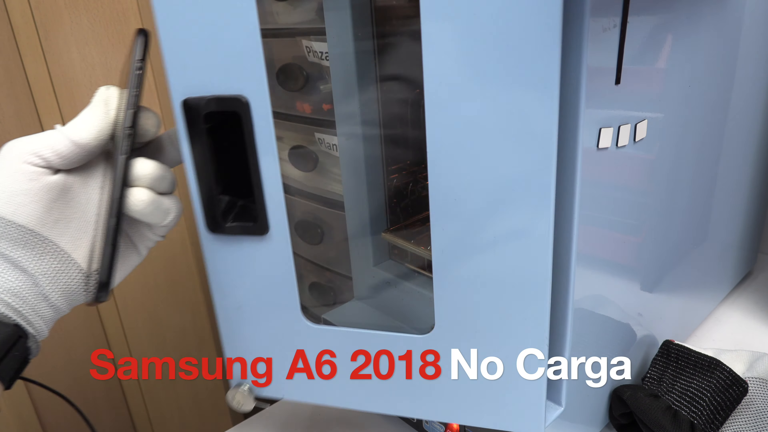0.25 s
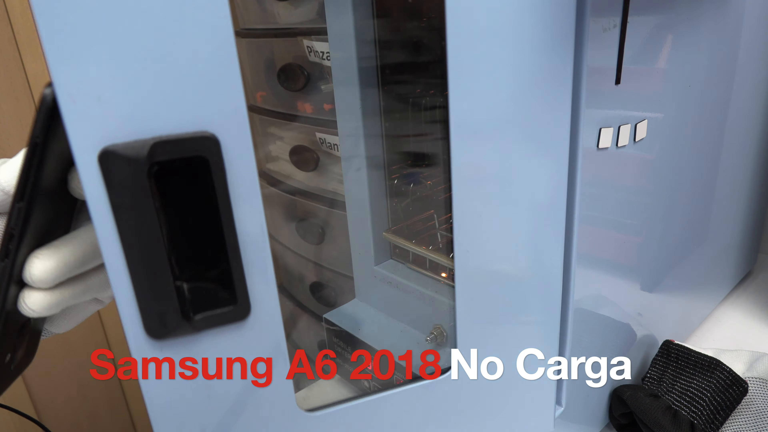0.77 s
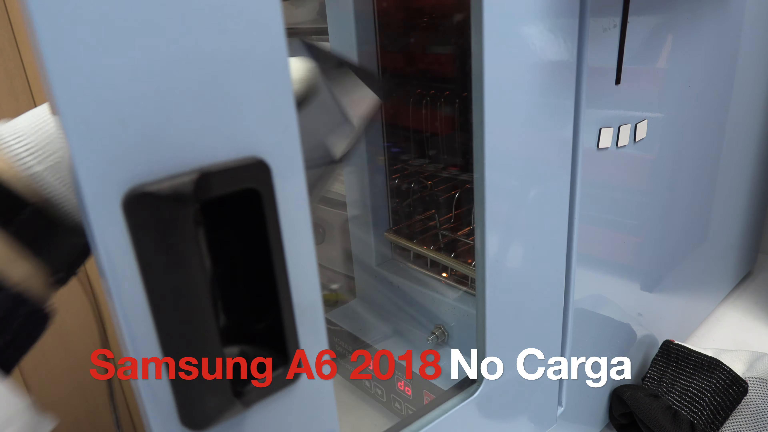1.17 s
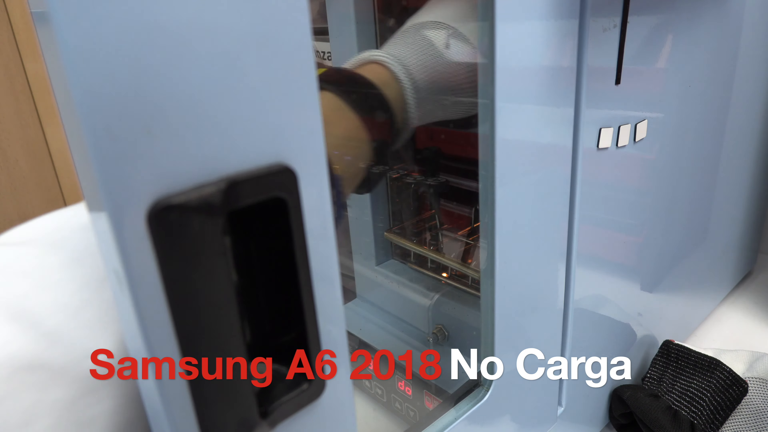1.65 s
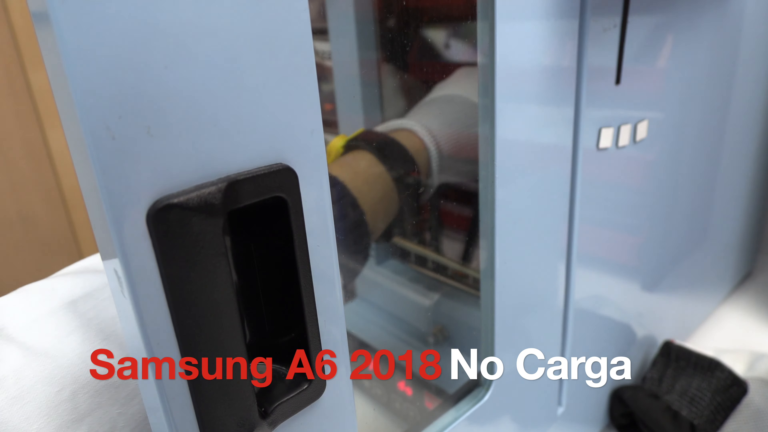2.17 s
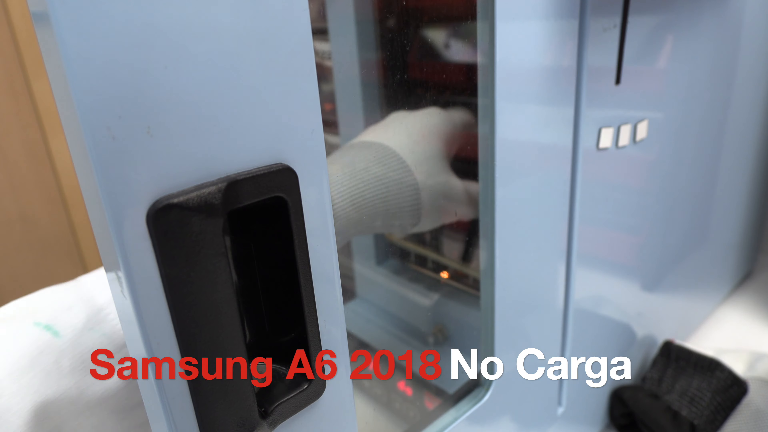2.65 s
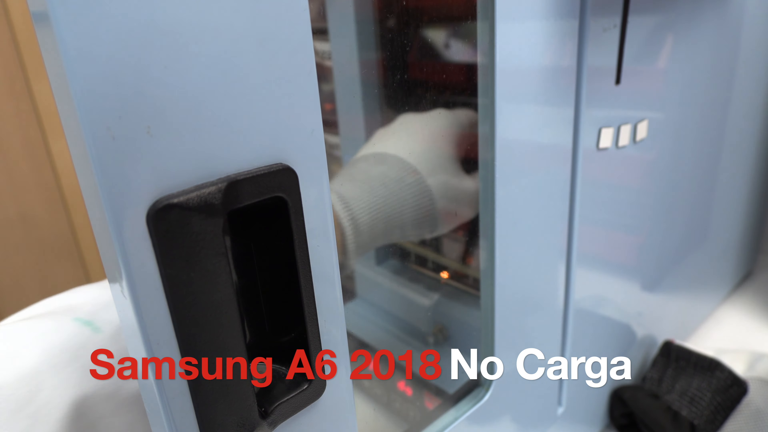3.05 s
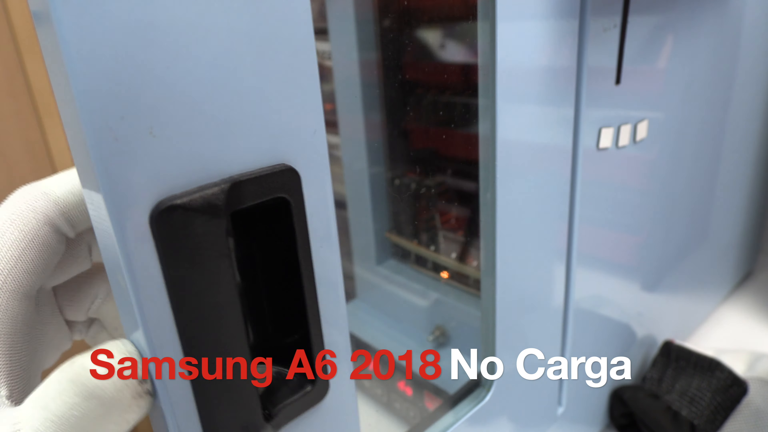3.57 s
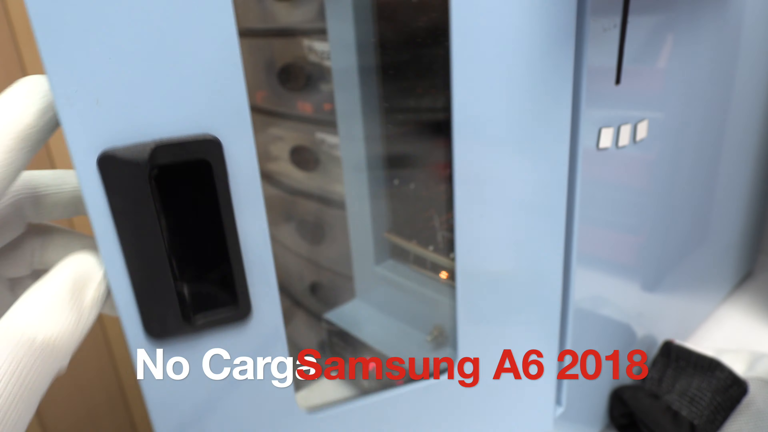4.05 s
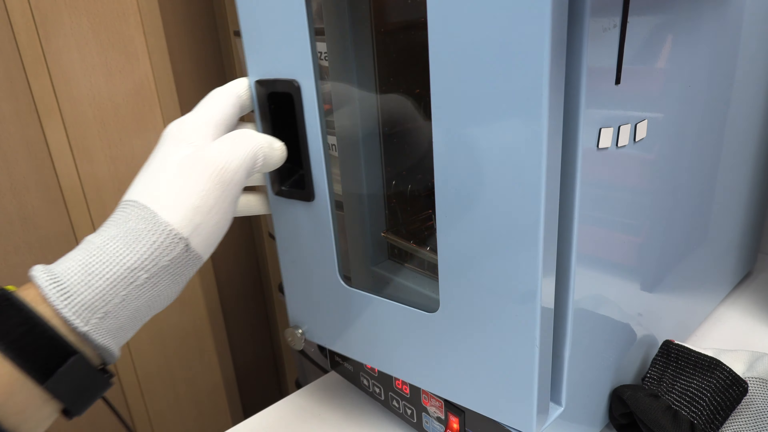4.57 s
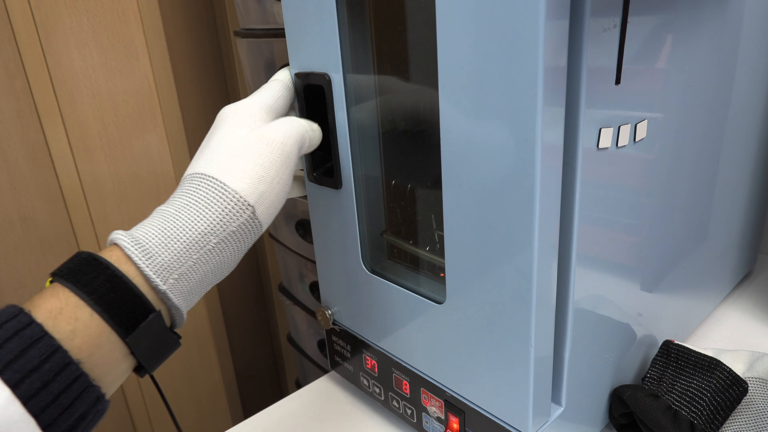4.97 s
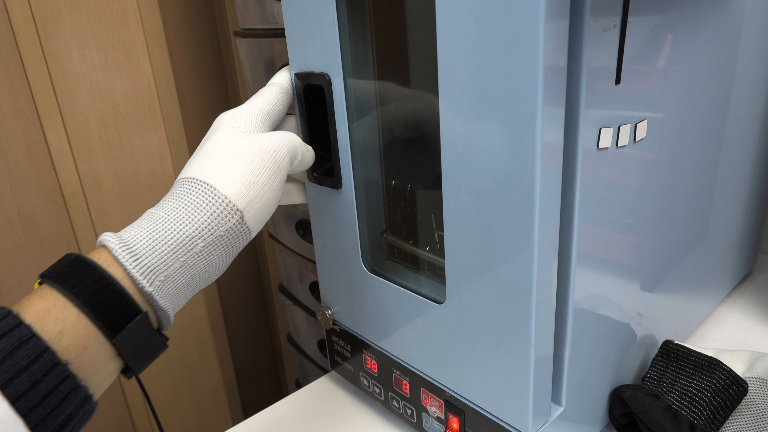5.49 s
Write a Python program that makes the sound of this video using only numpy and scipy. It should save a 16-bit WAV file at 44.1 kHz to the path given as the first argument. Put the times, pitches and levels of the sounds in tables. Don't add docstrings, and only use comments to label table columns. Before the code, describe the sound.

A quiet workshop with a low, steady ventilation wash and faint fan hum, heard close by a small stereo microphone. At 0 s a gloved hand brushes a light steel door; clicks and a dull panel thump follow, strongest near 0.16 s, with hinge knocks around 0.65 s and small ticks near 0.95-1.06 s. Soft cloth rustles from 1.2 to 1.9 s. At about 1.94 s an object lands on a wire shelf, a dense metallic clatter until 2.1 s over a hollow, swelling boom. It shifts lightly near 2.4 s, then scrapes and rattles from 2.76 to 3.05 s. Faint glove rustle and a small door tick come at 3.44 s, then near quiet. At 4.55 s the door clunks against its frame, rubber rubs in two hissing slides until 4.97 s, and a loud, bright latch snap with a panel thud lands at 4.99 s. A short echo fades into ventilation.

```python
import sys
import numpy as np
from scipy import signal
from scipy.fft import rfft, irfft
from scipy.io import wavfile
from scipy.ndimage import uniform_filter1d

SR = 44100
rng = np.random.default_rng(int(sys.argv[2]) if len(sys.argv) > 2 else 0)


def to_wav(sig):
    pcm = np.clip(np.atleast_2d(sig), -1, 1) * 32767
    pcm = np.round(pcm).astype(np.int16)
    wavfile.write(sys.argv[1], SR, pcm.T)


def nominal_scale(level):
    x = np.asarray(level, float) / 20
    return 10 ** x


N = 252620

# (frequency [Hz], likeness [0-1])
LEFT_RIGHT_LIKENESS = [(60, 0.98), (180, 1), (550, 0.9), (1650, 0.69), (4970, 0.39), (15000, 0.55)]


def evened(x):
    return x / np.sqrt(np.mean(x ** 2) + 1e-20)


def peaked(x):
    return x / np.sqrt(uniform_filter1d(x ** 2, 176).max() + 1e-20)


def read(points, hz):
    f, value = np.transpose(points)
    return np.interp(np.log(hz + 1), np.log(f + 1), value)


def add(mix, s, sound):
    part = mix[round(s * SR):][:len(sound)]
    part += sound[:len(part)]


def toward_left(db):
    return nominal_scale(np.array([[db], [-db]]))


def alike(first, other):
    return lambda hz: blend(first, other, np.clip(read(LEFT_RIGHT_LIKENESS, hz), -1, 1)[:, None])


def blend(first, other, likeness):
    return likeness * first + np.sqrt(1 - likeness ** 2) * other


def high_pass(x, order, hz):
    return signal.sosfilt(signal.butter(order, hz, "high", fs=SR, output="sos"), x)


def coloured(x, points, tilt_db=0):
    hz = np.fft.rfftfreq(len(x), 1 / SR)
    edge = np.minimum(hz / points[0][0], 1) ** 4
    gain_db = read(points, hz) + tilt_db * np.log2((hz + 1) / 4000)
    return evened(irfft(rfft(x) * edge * nominal_scale(gain_db), len(x)))


def resonate(x, hz, width):
    r = np.exp(-np.pi * width / SR)
    return evened(signal.lfilter([1, 0, -1], [1, -2 * r * np.cos(2 * np.pi * hz / SR), r * r], x))


def grainy(count, rough_db):
    lumps = evened(uniform_filter1d(rng.standard_normal(count), 200))
    return rng.standard_normal(count) * nominal_scale(rough_db * lumps)


def nearness(hz, spot_hz, reach):
    return np.maximum(-12 * (np.log2((hz + 1) / spot_hz) / max(reach, .15)) ** 2, -45)


def ring(modes, spot_hz, reach, length=.3):
    hz, db, t60 = np.transpose(modes)[:, :, None]
    t = np.arange(round(length * SR)) / SR
    level = nominal_scale(db + nearness(hz, spot_hz, reach) - 60 * t / t60)
    return (level * np.sin(2 * np.pi * hz * t)).sum(0)


def clicks(rows, spot_hz, reach):
    return [(s, db, treble_db, spot_hz, reach, chatter_ms) for s, db, treble_db, chatter_ms in rows]


def padded(rows, treble_db, reach):
    return [(s, db, treble_db, spot_hz, reach, chatter_ms) for s, db, spot_hz, chatter_ms in rows]


def hits(rows, body, sheet_db, sheet_t60, rise_ms, fine, wires_db):
    # (frequency [Hz], level [dB per Hz])
    crack = [(2500, -30), (4000, -19), (5100, -5), (6200, -2), (7600, 3), (9000, -2.5), (10800, -5.5),
             (12500, -10), (14500, -15), (16000, -72)]
    count = 8192
    out, t = np.zeros(N), np.arange(count) / SR
    hz = np.fft.rfftfreq(count, 1 / SR)
    wires = ring(fine, 7000, 9.0, .05)
    for s, db, treble_db, spot_hz, reach, chatter_ms in rows:
        sizes = nominal_scale(2.5 * np.minimum(rng.exponential(1, count), 3.1))
        contacts = rng.standard_normal(count) * sizes
        rise = np.minimum(t * 1000 / (rise_ms + 0.085 * chatter_ms), 1)
        fade = np.exp(-t * 1000 / max(chatter_ms, .5)) * rise
        chatter = fade * contacts

        stored = np.sqrt(signal.lfilter([1], [1, -nominal_scale(-120 / (sheet_t60 * SR))], fade ** 2))
        sheet = stored * irfft(rfft(contacts) * nominal_scale(nearness(hz, spot_hz, reach)))

        hardness = (3.75 / max(chatter_ms, 4.5)) ** 2
        first = signal.unit_impulse(count, 20) * hardness * np.linalg.norm(chatter)
        strong = signal.fftconvolve(first + 0.68 * chatter, ring(body, spot_hz, reach, .2))[:count]
        ringing = peaked(strong) + nominal_scale(sheet_db) * reach * peaked(sheet)
        add(out, s, nominal_scale(db) * peaked(ringing))

        fizz = nominal_scale(wires_db) * peaked(signal.fftconvolve(chatter, wires)[:count])
        edge = coloured(contacts, crack, .2 * min(treble_db + 8, 0))
        bright = peaked((fade + 0.22 * stored / stored.max()) * edge)
        add(out, s, nominal_scale(db + treble_db) * (fizz + bright))
    return out


def booms(rows, modes, swell_ms):
    out = np.zeros(N)
    for s, db, spot_hz in rows:
        low = ring(modes, spot_hz, 0.61, 0.59)
        swell = 1 - np.exp(-(np.arange(len(low)) * 1000 / SR / swell_ms) ** 2)
        add(out, s, nominal_scale(db) * peaked(swell * low))
    return out


def workshop():
    # (frequency [Hz], level [dB per Hz])
    air = [(18, -65.5), (30, -46), (64, -12), (160, -8.5), (187, -22), (263, -6), (292, -17), (432, -16),
           (546, -7.5), (606, -14), (921, -15), (10200, -32), (15500, -42.5)]
    # (frequency [Hz], width [Hz], level [dB])
    hum = [(167.4, 19.6, -76), (263.7, 24, -71), (344.3, 29, -76), (540, 68, -76), (918, 12, -81.5)]
    frames, hz = N // 256 + 5, np.fft.rfftfreq(1024, 1 / SR)
    a, b, c, d, patches = rng.standard_normal((frames, 513, 5)).T
    patches = evened(uniform_filter1d(uniform_filter1d(patches, 12, 0), 14, 1))
    left = a + 1j * b
    z = np.array([left, alike(left, c + 1j * d)(hz)])
    z *= nominal_scale(read(air, hz)[:, None] + 0.27 * patches)
    wash = signal.istft(z, nperseg=1024, noverlap=768)[1][:, :N]
    x = rng.standard_normal(N)
    fan = sum(nominal_scale(db) * resonate(resonate(x, f, width), f, width) for f, width, db in hum)
    return nominal_scale(-64.5) * evened(wash) + fan


def door_blows():
    # (frequency [Hz], level [dB], t60 [s])
    door_modes = [(600, 27.5, 0.043), (830, 20, 0.063), (1080, 19.5, 0.016), (1122, 9.5, .09),
                  (1320, 6, 0.14), (1410, -9.5, 0.077), (1650, -1, 0.03), (1775, -10, 0.051),
                  (1930, -9, 0.088), (2120, -7, 0.06), (2260, 0, 0.037), (2406, 9.5, 0.045),
                  (2500, 1.5, .05), (2586, 3, 0.07), (2800, 6.5, 0.07), (3050, -1, .04), (3410, -12, .025),
                  (4080, 10, 0.024)]
    # (frequency [Hz], level [dB], t60 [s])
    latch_modes = [(5220, -5, .02), (6020, -5, .02), (6500, 7, .014), (7120, -9, .03), (7740, -3, .035),
                   (8080, -5, .045), (8700, -8, .03)]
    # (time [s], blow [dB], treble re blow [dB], chatter [ms])
    door_clicks = [(.060, -42.5, -15, 3.6), (.074, -53.5, -4, 3.5), (.156, -35, -21.5, 2.5),
                   (.163, -37, -29, 2.7), (.645, -46, -21, 1.4), (.742, -62, -7, 5.9), (.955, -53, -7, 2.2),
                   (.979, -58.5, -9, 2.3), (1.04, -61.5, -9, 2.5), (1.05, -59, -8, 3.6),
                   (1.063, -57.5, -8, 4), (1.676, -72, 7.5, 3.5), (3.413, -58, -16, 19),
                   (3.44, -53, -12.5, 3.8), (4.016, -64, -10, 6.3), (4.154, -59, -3.5, 1.4)]
    # (time [s], blow [dB], treble re blow [dB], chatter [ms])
    latch_clicks = [(4.526, -58.5, -3, 11), (4.547, -31, -18, 5.1), (4.560, -31, -20, 3.1),
                    (4.572, -37, -16, 11), (4.979, -25, -8, 1.3), (4.986, -21, -6.5, 1.9),
                    (4.996, -25, 3, 1.7), (5.004, -30.5, 1.5, 1.9), (5.06, -44, -21, 3.1)]
    # (time [s], blow [dB], struck spot [Hz], chatter [ms])
    door_rings = [
        (.0, -48, 1930, 8.5),
        (.001, -56, 2780, 18),
        (.185, -51, 2050, 34),
        (.647, -44, 1710, 7.5),
        (.655, -52, 1330, 3.7),
        (1.225, -60, 1630, 11),
        (1.27, -64, 1630, 11),
        (1.31, -63, 1580, 6),
        (3.765, -63, 1350, 7),
        (4.872, -48, 600, 4),
    ]
    # (time [s], blow [dB], struck spot [Hz], chatter [ms])
    door_knocks = [(.132, -49.5, 600, 7.1), (.158, -41.5, 790, 1.2), (.65, -58.5, 830, 4.9),
                   (.958, -58, 1000, 15), (3.442, -55.5, 3300, 4), (3.756, -57, 3180, 2.8),
                   (4.5445, -36.5, 5330, 2.7), (4.556, -38.5, 700, 12.6), (4.965, -51.5, 700, 4),
                   (4.986, -28, 2700, 9), (5.002, -33, 1080, 4), (5.017, -34, 1290, 4.9),
                   (5.012, -37, 2650, 26), (4.6, -49, 1900, 24)]
    rows = clicks(door_clicks, spot_hz=2050, reach=1) + clicks(latch_clicks, spot_hz=2310, reach=0.91)
    rows += padded(door_rings, treble_db=-23.5, reach=0.17) + padded(door_knocks, treble_db=-26, reach=0.98)
    blows = hits(rows, door_modes, sheet_db=4.0, sheet_t60=0.059, rise_ms=0.4, fine=latch_modes, wires_db=-10.0)
    return high_pass(blows, 2, 420.0)


def panel_booms():
    # (frequency [Hz], level [dB], t60 [s])
    panel_modes = [(55, -20.5, .15), (84.1, -17, 0.225), (108.7, -9.5, 0.2), (160, -8.5, 0.2),
                   (220, 1, 0.14), (262.9, -4.5, 0.29), (375, -4, 0.089), (426.5, 7, 0.059),
                   (615.5, -1.5, 0.14)]
    # (time [s], level [dB], favoured frequency [Hz])
    pushes = [(.0, -56, 100), (.01, -51.5, 266), (.1, -59, 199), (4.547, -54.5, 110), (.062, -48, 406),
              (.157, -49, 490), (.665, -53, 220), (.955, -58, 407), (1.065, -53, 250), (1.09, -61, 100),
              (3.44, -60, 405), (4.43, -59, 85), (4.535, -51.5, 169), (4.546, -63, 380), (4.56, -56, 600),
              (4.58, -50, 230), (4.61, -59, 120), (4.996, -56, 60.2), (4.997, -35, 118.2),
              (5.004, -33, 290), (5.017, -31.5, 396), (5.035, -59, 260)]
    return booms(pushes, panel_modes, swell_ms=1.62)


def rustle():
    # (fastest moment [s], half length [s], level [dB], treble re level [dB])
    strokes = [(0.018, 0.12, -54.5, -7.5), (0.062, .012, -64, 10), (0.097, 0.021, -61.5, 6.5),
               (.26, 0.55, -66.5, -27), (0.952, 0.08, -72, -5), (1.2, 0.35, -66, -10),
               (1.449, 0.13, -63, 0), (1.673, 0.24, -61.5, -9), (1.893, 0.17, -67, -28),
               (2.3, 0.25, -62, -30), (2.435, 0.13, -59, -31), (2.762, .09, -62.5, -12),
               (3.08, 0.25, -66, -26), (3.442, 0.45, -67.5, -5), (3.694, .2, -76, -24),
               (4.0, 0.11, -71.5, -21), (4.14, 0.29, -81.5, 12.5), (4.396, 0.16, -74, -1.2)]
    # (frequency [Hz], level [dB per Hz])
    cloth = [(290, -5), (500, -9), (560, -7), (610, -4), (896, -5), (2170, -0.5), (5010, -13),
             (7680, -15.5), (12500, -37.5), (15000, -53)]
    s, half_s, level_db, treble_db = np.transpose(strokes)[:, :, None]
    t = np.arange(0, N, 64) / SR
    stroke = nominal_scale(level_db - 13 * abs((t - s) / half_s) ** 1.16)

    def together(x):
        return np.interp(np.arange(N) / SR, t, np.linalg.norm(x, axis=0))

    dull, bright = together(stroke), together(stroke * nominal_scale(treble_db))
    shared = grainy(N, 1.4)
    sides = [shared + 0.5 * rng.standard_normal(N) for _ in "LR"]
    return np.array([dull * coloured(x, cloth, -3.0) + bright * coloured(x, cloth, 4.9) for x in sides])


def shelf_blows():
    # (frequency [Hz], level [dB], t60 [s])
    shelf_modes = [(353, -6, 0.12), (400, 2, 0.075), (447, -2, .06), (506, -4, 0.075), (614.3, 14, 0.2),
                   (650, 14, 0.08), (750, 9, 0.08), (872, 4, 0.18), (927, 15, 0.08), (963, 16, 0.11),
                   (1054, 7.5, 0.15), (1307, 12, 0.19), (1430, 5, 0.084), (1507, 9, .09), (1553, 15, 0.064),
                   (1820, -12, 0.071), (2193, 13, 0.085), (2500, -18, 0.045), (2824, 13, 0.038),
                   (3240, 11, 0.021)]
    # (frequency [Hz], level [dB], t60 [s])
    wire_modes = [(5070, -2, 0.035), (5730, 2, 0.0083), (6100, -8, .025), (6500, -11, .03),
                  (7120, -1, 0.056), (8600, -7, 0.057)]
    # (time [s], blow [dB], treble re blow [dB], chatter [ms])
    shelf_clicks = [(1.941, -43, -3, 17), (1.949, -35.5, -8, 4.9), (1.964, -32, -2.5, 6.9),
                    (1.977, -33, -11, 5.3), (1.988, -39, -5, 2.1), (2.001, -37.5, -7.5, 13),
                    (2.024, -39.5, -13, 4.5), (2.044, -33.5, -2.5, 4.4), (2.052, -41, -5, 6),
                    (2.065, -37, -6, 9), (2.081, -40.5, -8, 7), (2.373, -59, -7, 12),
                    (2.400, -52.5, -5, 7.7), (2.438, -44, -2, 4.5), (2.475, -49.5, -1, 4),
                    (2.757, -52.5, -8, 6.8), (2.862, -48, -22, 23), (2.897, -44.5, -8, 7.4),
                    (2.906, -42, -5.5, 11), (2.937, -40.5, -5, 6.1), (2.958, -44.5, -5.5, 9),
                    (3.001, -44, -8.5, 9.5), (3.02, -45.5, -11.5, 8.6)]
    # (time [s], blow [dB], struck spot [Hz], chatter [ms])
    shelf_rings = [
        (1.943, -38, 1600, 6.8),
        (2.406, -49, 1550, 6),
        (2.41, -55, 640, 34),
        (2.837, -45.5, 1480, 52),
        (2.853, -51.5, 3250, 63),
        (2.76, -55, 610, 33),
        (2.861, -50, 660, 4.4),
        (2.1, -56, 840, 86),
        (2.908, -43.5, 640, 7),
        (2.995, -47, 640, 11.5),
    ]
    # (time [s], blow [dB], struck spot [Hz], chatter [ms])
    shelf_knocks = [(2.0, -35, 380, 15), (2.251, -56, 3100, 6), (2.284, -55, 3700, 4.4),
                    (2.29, -52.5, 810, 6.8), (2.845, -58, 2900, 32), (3.054, -60, 2300, 7.1),
                    (2.758, -52, 1170, 6.6), (2.913, -42.5, 1700, 3.3), (2.975, -50, 1540, 14),
                    (2.012, -41.5, 4700, 3.6), (1.99, -37, 1300, 1.4)]
    rows = clicks(shelf_clicks, spot_hz=1760, reach=1.47)
    rows += padded(shelf_rings, treble_db=-20.5, reach=0.12) + padded(shelf_knocks, treble_db=-21, reach=0.68)
    blows = hits(rows, shelf_modes, sheet_db=0.0, sheet_t60=0.074, rise_ms=0.7, fine=wire_modes, wires_db=-8.0)
    return high_pass(blows, 2, 280.0)


def cavity_booms():
    # (frequency [Hz], level [dB], t60 [s])
    air_modes = [(92, -11, 0.42), (162, 0, 0.33), (187, -10, 0.18), (215, 1, 0.26), (230.4, -10, 0.15),
                 (262, 1.5, 0.22), (335, -10, 0.13)]
    # (time [s], level [dB], favoured frequency [Hz])
    pushes = [(1.952, -29, 220), (1.96, -45, 92), (1.972, -32.5, 268), (2.003, -36.5, 272),
              (2.028, -29.5, 193), (2.068, -39.5, 176), (2.09, -32.5, 177), (2.29, -52.5, 246),
              (2.412, -39.5, 215), (2.44, -55, 202), (2.765, -46.5, 170), (2.85, -52, 195.5),
              (2.905, -41, 208), (2.94, -54, 198), (2.975, -40.5, 193), (3.01, -53, 190), (3.03, -46, 195),
              (3.05, -55.5, 93), (2.95, -57, 100), (3.12, -55, 207), (3.2, -60, 250), (2.475, -53, 228),
              (2.43, -54.5, 92), (2.5, -51, 165), (2.55, -57, 215), (2.53, -61, 92), (2.8, -53, 160),
              (2.14, -49, 162), (2.16, -56, 215), (2.3, -55, 180), (3.08, -50, 162)]
    return booms(pushes, air_modes, swell_ms=5.44)


def seal():
    # (time [s], level [dB])
    rub = [
        (4.59, -56),
        (4.648, -51.5),
        (4.7, -57),
        (4.74, -65),
        (4.775, -67.5),
        (4.81, -57.5),
        (4.85, -52.5),
        (4.91, -53.5),
        (4.958, -55),
        (4.97, -53.5),
    ]
    # (frequency [Hz], width [Hz], level [dB])
    frame = [(700, 570, -10.5), (2100, 1180, -2), (2970, 600, -4.5), (4120, 770, -4.5), (6060, 1100, 8),
             (7800, 2400, 4), (11000, 1380, -3)]
    s, hiss_db = np.transpose(rub)
    t = np.arange(s[0], s[-1] + 0.018, 1 / SR)
    hiss_db = np.interp(t, s, hiss_db)
    body_db = -55.5 + 0.62 * (hiss_db - hiss_db.max()) + 19 * (t - s[0])
    bands = []
    for hz, width, db in frame:
        friction = resonate(grainy(len(t), 1.7), hz, 2.5 * width)
        bands.append(nominal_scale(db) * resonate(friction, hz, width))
    body, hiss = evened(sum(bands[:4])), evened(sum(bands[4:]))
    rubbing = nominal_scale(body_db) * body + nominal_scale(hiss_db) * hiss
    out = np.zeros(N)
    add(out, s[0], rubbing * signal.windows.tukey(len(t), .06))
    return out


def ports(x):
    # (frequency [Hz], level re their sum [dB])
    width = [(60, -57), (200, -38), (550, -18.5), (1300, -10.5), (3000, -12.5), (6000, -8), (10000, -6.5),
             (15000, -8)]
    # (frequency [Hz], share)
    lean = [(300, 0), (700, .04), (1400, .1), (2800, -0.0013), (5600, -.02), (9000, .03), (13000, -.1)]
    scatter = rng.standard_normal(4096) * np.exp(-np.arange(4096) / SR / 0.0048)
    hz = np.fft.rfftfreq(4096, 1 / SR)
    scatter = np.roll(scatter / np.linalg.norm(scatter), 1024)
    scatter = irfft(rfft(scatter) * nominal_scale(read(width, hz)))
    scatter = scatter + np.roll(irfft(read(lean, hz)), 1024)
    side = signal.fftconvolve(x, scatter)[1024:N + 1024]
    return x + np.array([[1], [-1]]) * side


def room(x):
    # (frequency [Hz], t60 [s])
    decay = [(100, 0.63), (400, 0.43), (1500, 0.41), (4000, 0.38), (9000, 0.29)]
    taps = np.zeros((2, SR // 2))
    at = np.arange(200, SR // 2 - 20, 20)
    at = at + rng.integers(0, 20, (2, len(at)))
    np.put_along_axis(taps, at, rng.choice([-1., 1.], at.shape), 1)
    hz, t, z = signal.stft(taps, SR, nperseg=256)
    z[1] = alike(z[0], z[1])(hz)
    z = z * nominal_scale(-60 * t / read(decay, hz)[:, None])
    tail = signal.istft(z, SR, nperseg=256)[1]
    return signal.fftconvolve(x[None], tail / np.linalg.norm(tail[0]), axes=1)[:, :N]


def scene():
    around = workshop()
    door = door_blows() + seal()
    shelf = shelf_blows()
    bass = panel_booms() + cavity_booms()
    near = ports(door) * toward_left(.3) + ports(shelf) * toward_left(.4) + bass
    echo = room(nominal_scale(-10.5) * door + nominal_scale(-8.5) * shelf + nominal_scale(-9.0) * bass)
    return near + echo + (rustle() + around) * toward_left(.25)


def roll_off(x):
    return signal.sosfilt(signal.butter(12, 15710, fs=SR, output="sos"), x)


def record(dry):
    # (frequency [Hz], level [dB])
    microphone = [(1000, -0.27), (3200, 0.27), (3700, -2.5), (5000, -0.14), (7000, -1.36), (8200, -0.5),
                  (9200, -3.5), (10300, -4.5), (12000, -4.5), (13400, -5), (14400, -4)]
    x = high_pass(dry, 4, 48.0)
    x = signal.sosfilt(signal.butter(4, 14200.0, fs=SR, output="sos"), x)
    hz = np.linspace(0, SR / 2, 257)
    ripples = signal.firwin2(255, hz, nominal_scale(read(microphone, hz)), fs=SR)
    x = signal.oaconvolve(x, ripples[None], "same")
    return roll_off(x)


dry = scene()
out = record(dry)
to_wav(out)
```